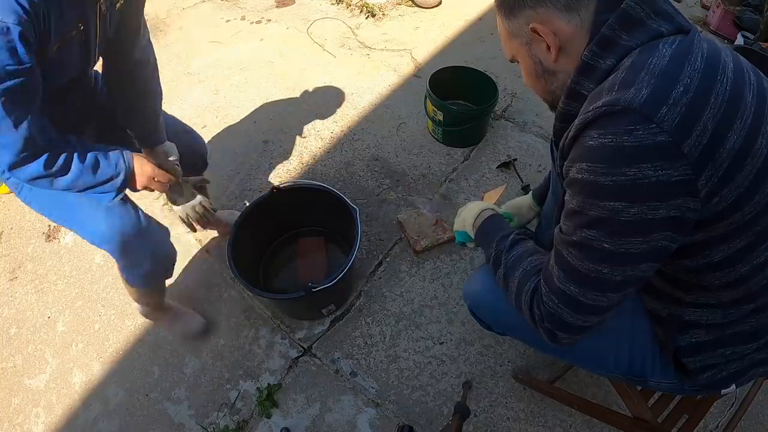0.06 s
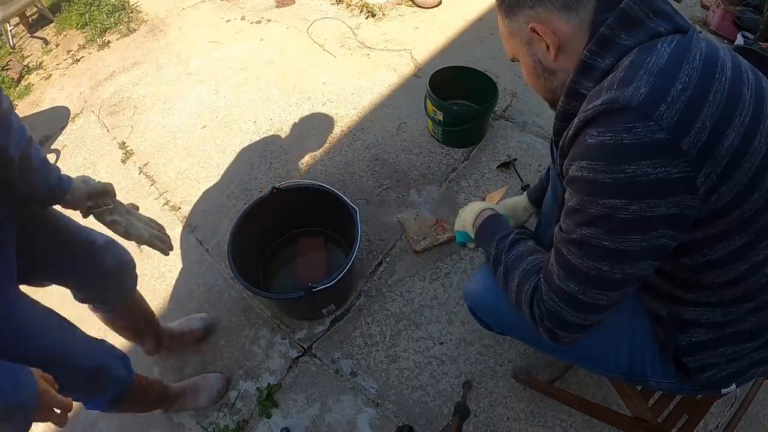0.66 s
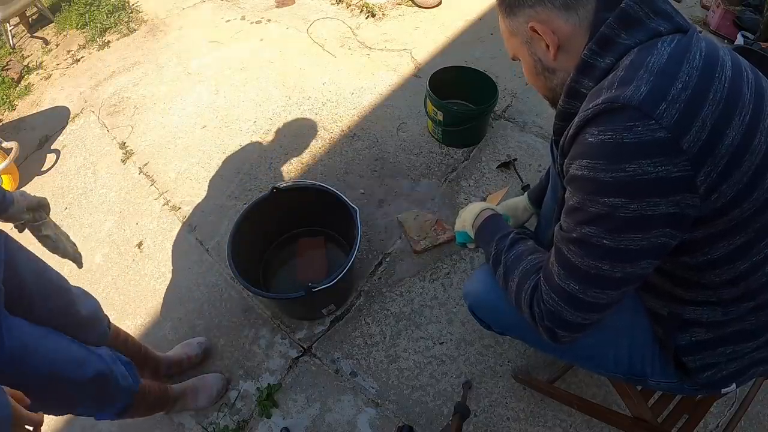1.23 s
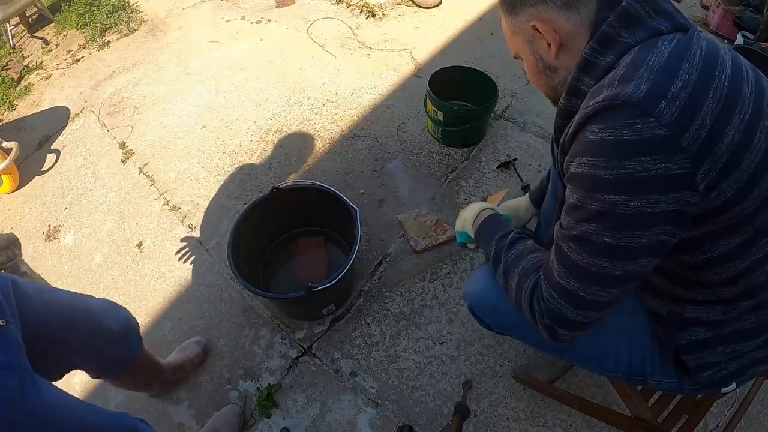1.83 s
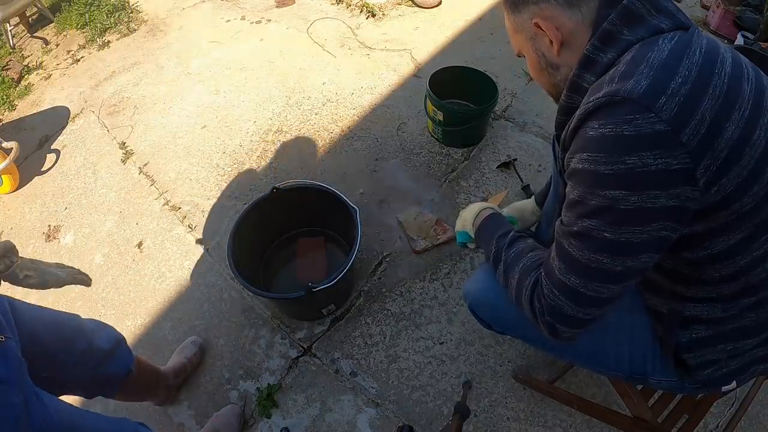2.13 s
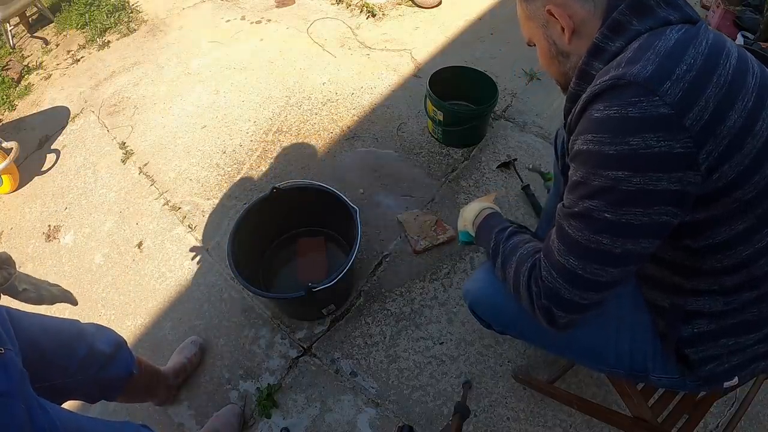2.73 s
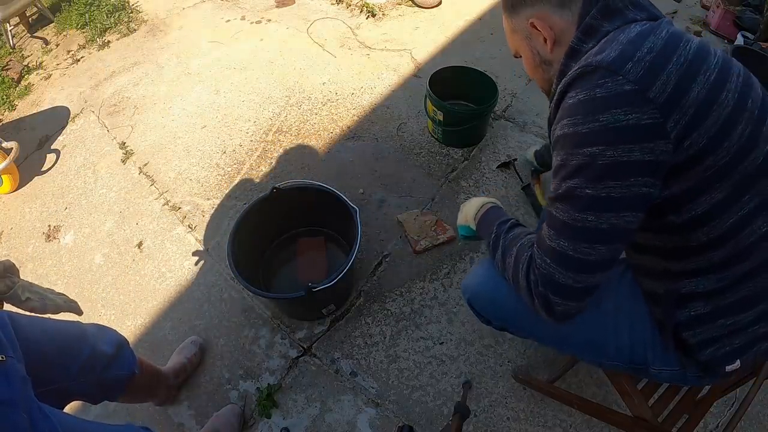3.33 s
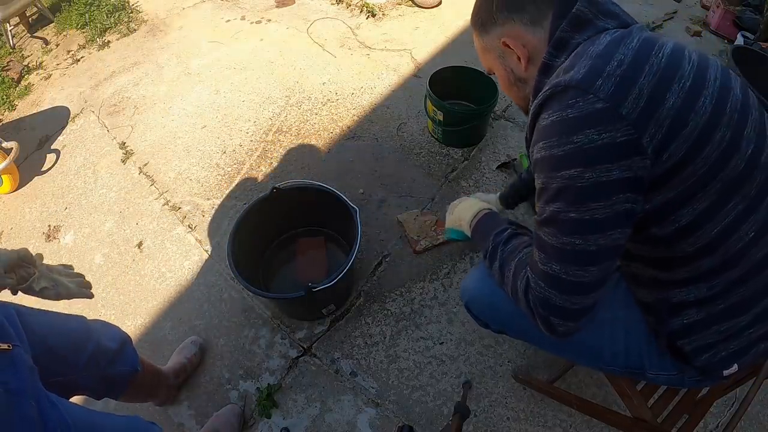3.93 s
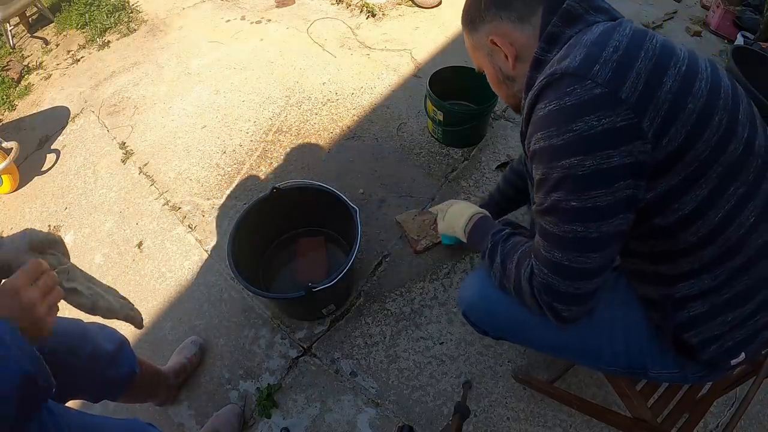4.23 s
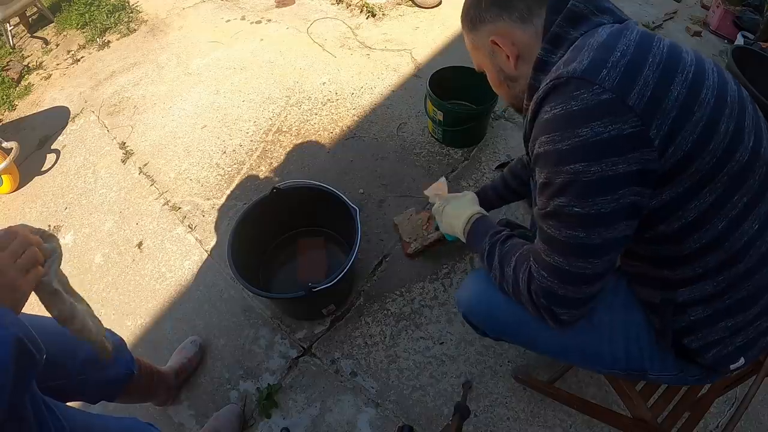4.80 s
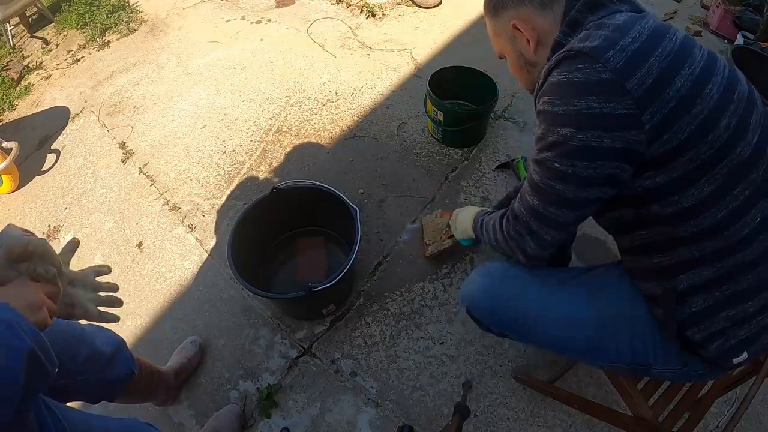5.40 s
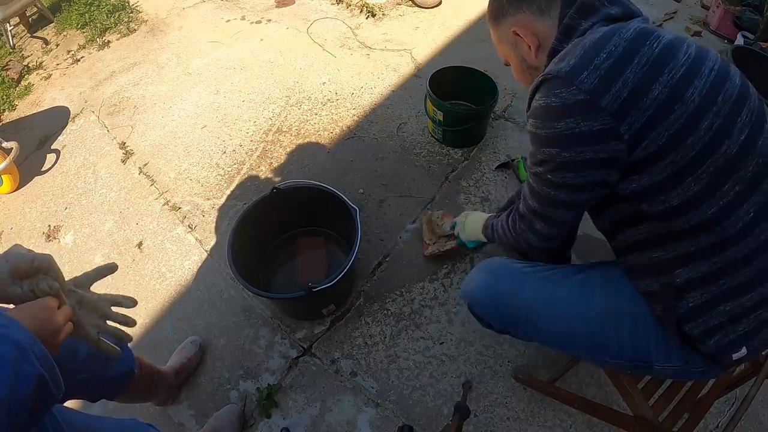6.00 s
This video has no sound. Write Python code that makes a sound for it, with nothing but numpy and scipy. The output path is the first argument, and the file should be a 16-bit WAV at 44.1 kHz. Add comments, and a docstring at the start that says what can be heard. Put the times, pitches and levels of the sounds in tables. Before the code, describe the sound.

A plastic spray bottle gives six short, even hisses, its trigger clicking with each, and a soft footstep thumps near the start. After a lull with a few small clicks, a steel blade scrapes a clay tile in quick, uneven, gritty strokes while the tile rocks and knocks hollowly on concrete. The sounds are fairly close and nearly mono, with slight echoes over quiet outdoor air.

```python
"""A clay tile is scraped clean with a steel blade, in quick, uneven strokes on a concrete yard.
Grit makes tile and blade ring; the tile rocks and knocks, and the air under it sounds hollow.
Before that, six even hisses, most likely from a clicking trigger sprayer, wet the tile,
and feet thump softly. Quiet outdoor air lies behind it all, and the ground and a wall echo."""
import sys
import numpy as np
from scipy import signal
from scipy.io import wavfile
from scipy.ndimage import uniform_filter1d

SR = 44100
rng = np.random.default_rng(int(sys.argv[2]) if len(sys.argv) > 2 else 0)


def materialize(psi):
    """Save the field psi as 16-bit PCM at rate SR to the path in sys.argv[1].

    A 1-D psi becomes a single channel; in a 2-D psi each row is a channel.
    """
    bounded = np.clip(np.atleast_2d(psi).T, -1, 1)
    quanta = np.round(bounded * 32767).astype(np.int16)
    wavfile.write(sys.argv[1], SR, quanta)


N = 271248
T = np.arange(N) / SR

# overall tone of the tile, the blade and the spray: (frequency [Hz], level [dB])
TILE_TONE = [(100, -47), (300, -37), (500, -23), (1000, 5.5), (1500, -2.5), (2400, 0.5), (3300, 0),
             (4500, -1), (6500, -13.5), (8200, -18.5), (10500, -28), (13000, -61.5)]
BLADE_TONE = [(500, -28), (2500, -1.5), (4500, 0.5), (7000, -11), (8400, -7), (9700, -9.5), (12300, -11),
              (13300, -26), (14300, -52)]
SPRAY_TONE = [(59, -75), (100, -35.5), (239, -16), (347, -18.5), (427, -11.5), (703, -3), (865, -7),
              (1090, -4), (1580, -4.5), (3620, 1), (6750, -8.5), (8300, -13), (10700, -9), (12100, -13.5),
              (14200, -32.5)]
# notes at which the tile and the blade ring: (pitch [Hz], width [Hz], boost [dB])
TILE_NOTES = [(1850, 80, -19.5), (2108, 430, 6), (2493, 190, 9), (2840, 19, 8), (3200, 120, 12.5),
              (3940, 220, 2), (6700, 520, 6.5)]
BLADE_NOTES = [(2430, 39, 5.1), (3316, 44, 4.2), (4000, 30, 9), (4045, 30, 19.4), (4934, 38, 7.4),
               (5500, 60, 7.4), (6140, 61, 17), (6940, 118.4, 20), (8100, 39, 12.13), (9270, 110, 16.5),
               (10030, 90, 15), (11250, 130, 11), (12200, 60, 4.7), (12800, 50, 9.4)]
# trigger squeezes: (full pressure at [s], let go at [s], first hiss level [dB], click level [dB])
SQUEEZES = [(-.04, 0.072, -26.5, -30), (0.441, 0.568, -18.5, -26), (0.933, 1.083, -22, -27),
            (1.436, 1.584, -21.5, -28), (1.995, 2.169, -19.5, -32), (2.435, 2.598, -22.5, -28)]


def scrapes(swell_db=19.5, fade_db=27.5, release_s=0.031, judder_db=2, settle_db=9.5, settle_ratio=1.15):
    """The edge catches and slips; its grit shakes the tile, the air under it and the blade."""
    # hand strokes: (start [s], swell [s], fade [s], level [dB], flatness [0-1], hollow pitch [Hz])
    strokes = [(1.873, .012, 0.48, -40.5, 0.57, 1000), (3.668, 0.018, 0.058, -31.5, 0.54, 1050),
               (4.264, 0.061, 0.036, -17.5, 0.48, 560), (4.352, 0.067, 0.045, -17, 0.73, 604),
               (4.783, 0.011, 0.061, -29, 1, 1040), (4.898, 0.027, 0.081, -28, 1, 2330),
               (4.921, 0.018, 0.09, -24.5, 0.96, 1006), (4.961, 0.021, 0.068, -25.5, 0.87, 1060),
               (5.24, 0.0067, 0.095, -29, 0.84, 680), (5.281, 0.07, 0.04, -28, 0.83, 810),
               (5.381, 0.003, 0.07, -25, 0.54, 1080), (5.448, .018, .14, -29.5, 0.05, 900),
               (5.535, 0.029, 0.045, -28, 0.28, 940), (5.641, 0.0054, 0.08, -25.5, 0.3, 810),
               (5.707, 0.021, .05, -14, 0.55, 565), (5.891, 0.0053, 0.09, -35, 0.34, 850),
               (5.932, 0.041, 0.11, -16.5, 0.2, 1040), (6.01, .009, 0.016, -7, .4, 766),
               (6.03, 0.041, 0.02, -25, 0.63, 595), (6.095, 0.0042, 0.17, -27.5, 0.28, 744)]
    out, t = np.zeros(N), T[:SR // 3]
    for start, swell, fade, db, flat, hollow_hz in strokes:
        length = swell + fade
        force = amp(np.interp(t, [0, swell, length], [-swell_db, 0, -fade_db]))
        force *= np.exp(-np.maximum(t - length, 0) / release_s)
        slips = unit(amp(judder_db * unit(uniform_filter1d(rng.standard_normal(len(t)), size=180))))
        grit = grains(len(t), per_s=1200, spread_db=4.5, dust=.35)
        rub = force * slips * (1 - np.exp(-t / .001)) * grit
        cutoff_hz = 16000 / 2 ** (2.8 * flat ** 4)  # a flat face rubs duller
        rub = signal.lfilter(*signal.butter(1, cutoff_hz, fs=SR), rub)
        tile, blade = sliding(rub, TILE_TONE, TILE_NOTES), sliding(rub, BLADE_TONE, BLADE_NOTES)
        settled = np.interp(t, [0, swell, length], [0, .5, 1])  # the hollow note gets lower and louder
        gap = through(rub * (1 - settled), hollow(hollow_hz * settle_ratio))
        gap += through(rub * settled * amp(settle_db * settled), hollow(hollow_hz / settle_ratio))
        gains = balance(db, flat, hollow_db=(-21, 4), blade_db=(6.5, -32))
        for sound, gain in zip((tile, gap, blade), gains):
            add(out, start, gain * unit(sound) * np.sqrt(np.mean(force ** 2)))
    return out


def knocks(crumble_s=0.0026, chatter_s=0.0097):
    """The tile lands and crushes grit; the flatter it lands, the duller and more hollow the knock."""
    # hits of tile and blade: (time [s], level [dB], flatness [0-1], hollow pitch [Hz])
    hits = [(3.714, -22, 0.32, 1200), (4.264, -18.5, 0.45, 1770), (4.326, -2.5, 0.31, 456),
            (4.376, -9, 0.36, 700), (4.413, -2, 0.46, 420), (4.784, -9, 0.81, 994), (4.809, -16, 0.9, 1160),
            (4.965, -14, 0.53, 1010), (4.993, -11, 0.55, 1090), (5.017, -7, 0.51, 997),
            (5.241, -9, 0.42, 690), (5.289, -17, 0.7, 620), (5.385, -16, 0.28, 1000), (5.45, -23.5, 0, 909),
            (5.692, -23, 0.12, 787), (5.756, -13, 0.14, 536), (5.961, -7, 0, 1000), (5.994, -4.5, 1, 823),
            (6.023, -6.5, 0.9, 660), (6.035, -4.5, 0.44, 680), (6.081, -22, 0, 700)]
    out, t = np.zeros(N), T[:SR // 10]
    tile, blade = response(TILE_TONE, TILE_NOTES), response(BLADE_TONE, BLADE_NOTES)
    for start, db, flat, hollow_hz in hits:
        blow = (t == 0) + 0.25 * rng.standard_normal(len(t)) * np.exp(-t / crumble_s)
        cutoff_hz = max(14000 / 2 ** (5.1 * flat ** 2), 1500)
        blow = signal.lfilter(*signal.butter(2, cutoff_hz, fs=SR), blow)
        gap = hollow(hollow_hz)
        chatter = rng.standard_normal(len(t)) * np.exp(-t / chatter_s)  # the tile settles
        gap = unit(gap) + 0.73 * unit(through(gap, chatter))
        gains = balance(db, flat, hollow_db=(-28, 24), blade_db=(6, -61))
        for sound, gain in zip((through(blow, tile), gap, through(blow, blade)), gains):
            add(out, start, gain * sound / abs(sound).max())
    return out


def sliding(rub, tone, notes, spots=3, spot_s=0.028):
    """As the edge travels, the ringing passes from one touching spot to the next."""
    travel = T[:len(rub)] / spot_s
    shares = [np.maximum(np.cos(2 * np.pi * (travel - k) / spots), 0) for k in range(spots)]
    return sum(through(rub * share, touched(tone, notes)) for share in shares)


def touched(tone, notes, spread_db=3.5, detune=0.014):
    """Each spot brings out other notes, and the grip shifts their pitch a little."""
    chance = rng.standard_normal((len(notes), 2))
    return response(tone, [(hz * (1 + detune * shift), width, db + spread_db * boost)
                           for (hz, width, db), (shift, boost) in zip(notes, chance)])


def hollow(hz, fade_s=0.013):
    """The air gap under the tile gives a short, hollow note."""
    upper = amp(-6) * ring(hz * 1.5, fade_s * 0.81, rise_s=0.0014)
    lower = amp(-9) * ring(hz * 0.704, fade_s * 0.88, rise_s=0.00071)
    note = ring(hz, fade_s, rise_s=0.00023) + upper + lower
    return signal.lfilter(*signal.butter(2, [hz * 0.77, min(hz * 12, 14000)], "band", fs=SR), note)


def balance(db, flat, hollow_db, blade_db):
    """Volumes of tile, hollow and blade; each pair is (on edge [dB], flat [dB]) relative to the tile."""
    levels = np.array([0, np.interp(flat, [0, 1], hollow_db), np.interp(flat, [0, 1], blade_db)])
    return amp(db + levels - levels.max())


def sprays(rise_db_per_s=900, fall_db_per_s=355, leak_db=-19.5, spent_db=-22, lead_s=.03):
    """The jet hisses under pressure; it is fullest mid-squeeze and loses its fizz as it dies."""
    # peaks in the hiss: (frequency [Hz], width [Hz], boost [dB])
    hiss_peaks = [(3500, 2500, -14.5), (6670, 940, 3.5), (9400, 480, 4), (12000, 400, -2.5)]
    level, fullness = np.zeros(N), np.zeros(N)
    for full, let_go, db, _ in SQUEEZES:
        early, late = np.maximum(full - T, 0), np.maximum(T - let_go, 0)
        progress = np.clip((T - full) / (let_go - full), 0, 1)
        onset_db = np.maximum(-rise_db_per_s * early, leak_db)  # the nozzle leaks before full pressure
        jet = amp(db + onset_db + (spent_db - db) * progress - fall_db_per_s * late)
        jet *= np.clip((T - full + lead_s) / 0.0028, 0, 1)  # the valve opens
        mist = amp(-73 - 28.5 * late) * progress
        level += jet + mist
        fullness += jet * amp(2 - 6 * np.cos(np.pi * progress * .85) ** 2)
    droplets = grains(N, per_s=5000, spread_db=5, dust=1.1)
    hiss = unit(through(droplets, response(SPRAY_TONE, hiss_peaks)))
    body = signal.sosfiltfilt(signal.butter(2, 1100, fs=SR, output="sos"), hiss)
    fizz = signal.sosfiltfilt(signal.butter(2, 7000, "high", fs=SR, output="sos"), hiss)
    fizz_left = np.minimum(level / amp(-36.5), 1) ** 0.049
    return fullness * body + level * (hiss - body - (1 - fizz_left) * fizz)


def plastic_clicks(trigger_hz=4270, trigger_fade_s=.01, snap_s=0.0036, rattle_s=0.0022):
    """The bottle and its trigger snap: thin, loose plastic rings briefly and strikes twice."""
    # clicks of the bottle: (time [s], peak level [dB], pitch [Hz], fade [s])
    bottle_clicks = [(.115, -26, 1640, 0.0077), (0.695, -40, 4500, .016), (1.202, -44.5, 5500, .016),
                     (1.38, -34, 4150, 0.02), (1.943, -23, 3200, 0.011), (2.664, -14, 5040, 0.003),
                     (2.793, -37, 3120, 0.0077), (3.537, -31.5, 1623, .03), (3.547, -28.5, 4070, 0.003)]
    # notes of the plastic: (pitch [times the click's pitch], level [dB])
    plastic_notes = [(.56, -15), (0.738, -2.5), (1, 9), (1.129, 5.5), (1.48, -2.5), (1.8, -13), (2.25, -13)]
    out, t, tone = np.zeros(N), T[:SR // 5], response(SPRAY_TONE)
    presses = [(full - 0.025, db, trigger_hz, trigger_fade_s) for full, _, _, db in SQUEEZES if full > 0]
    releases = [(let_go + .068, -36, trigger_hz, trigger_fade_s) for _, let_go, _, _ in SQUEEZES]
    for start, db, hz, fade_s in presses + releases + bottle_clicks:
        notes = sum(amp(note_db) * ring(hz * ratio, fade_s, 0.0008) for ratio, note_db in plastic_notes)
        chatter = rng.standard_normal(len(t))
        rattle = unit(through(chatter * np.exp(-t / rattle_s), notes))
        snap = unit(through(chatter * np.exp(-t / snap_s), tone))
        click = signal.lfilter(*signal.butter(2, min(3 * hz, 14000), fs=SR), rattle + 0.38 * snap)
        click /= abs(click).max()
        add(out, start, amp(db) * click)
        add(out, start + 0.01, amp(db - 9) * click)  # the bounce
    return out


def footsteps(low_cut_hz=135):
    """A soft sole lands on concrete: a few low notes that die quickly."""
    # a foot thump at 0.332 s, sounding again twice off ground and wall, and a later faint thump: (time [s],
    # level [dB], pitch [Hz])
    thumps = [(.332, -1.5, 294.4), (.340, -2.5, 239), (0.35, -12, 266), (1.609, -26, 203)]
    # notes of a thump: (pitch [times the thump's pitch], level [dB], fade [s])
    notes = [(0.998, -1.5, 0.036), (1.452, -8.5, 0.027), (2.501, -15, 0.019), (6.2, -36, 0.061)]
    out = np.zeros(N)
    for start, db, hz in thumps:
        thump = sum(amp(note_db) * ring(hz * ratio, fade_s, 0.0013) for ratio, note_db, fade_s in notes)
        add(out, start, amp(db) * thump)
    return signal.sosfilt(signal.butter(3, low_cut_hz, "high", fs=SR, output="sos"), out)


def yard(dry, tail_db=-20, dull_hz=6000):
    """Nearby surfaces add a few echoes and a short, thin tail, slightly different at each ear."""
    # how long the tail lasts: (frequency [Hz], time to fall 60 dB [s])
    tail_fades = [(150, 0.3), (500, 0.12), (2000, 0.2), (5000, 0.05), (9000, 0.076), (14000, 0.32)]
    # echoes off ground, body and wall: (delay [s], level [dB])
    echoes = [(.0023, -26), (.0085, -25.5), (.0135, -25.5), (.019, -23.5), (.027, -31.5)]
    bounces = rng.choice([-1., 1.], (3, SR // 2)) * (rng.random((3, SR // 2)) < 4000 / SR)
    hz, t, bands = signal.stft(bounces * np.minimum(T[:SR // 2] / 0.004, 1), SR, nperseg=256)
    bands *= np.exp(-np.log(1000) * t / value_at(tail_fades, hz)[:, None])
    bands /= np.hypot(1, hz / dull_hz)[:, None]
    tails = signal.istft(bands, SR, nperseg=256)[1]
    tails = tails[:2] + 9.9 * tails[2]  # both ears share most of the tail
    tails *= amp(tail_db) / np.linalg.norm(tails[0])
    for delay, db in echoes:
        for ear in tails:
            add(ear, delay, amp(db) * np.array([.25, .5, .25]))  # rough surfaces return less treble
    return dry + np.array([through(dry, ear) for ear in tails])


def air():
    """Quiet outdoor background noise that drifts in level."""
    # tone of the background: (frequency [Hz], level [dB])
    tone = [(25, -5.5), (65, -4), (110, -11), (156, -1.5), (288, -6), (516, -9.5), (768, -15.5),
            (1100, -10.5), (2050, -16), (4000, -24), (8400, -41), (11000, -41), (14200, -55)]
    # its loudness: (time [s], level [dB])
    levels = [(0.0, -56), (2.71, -58), (3.19, -64.5), (5.2, -53)]
    noise = unit(through(rng.standard_normal(N), response(tone)))
    return noise * amp(np.interp(T, *np.transpose(levels)))


def grains(count, per_s, spread_db, dust):
    """Grit or droplets: clicks of uneven size over a bed of fine noise."""
    sizes = amp(spread_db * np.minimum(rng.exponential(1, count), 3)) * rng.choice([-1, 1], count)
    clicks = sizes * (rng.random(count) < per_s / SR)
    return unit(unit(clicks) + dust * rng.standard_normal(count))


def ring(hz, fade_s, rise_s):
    """One note that starts softly and falls 60 dB in fade_s."""
    t = T[:SR // 5]
    return np.sin(2 * np.pi * hz * t) * np.exp(-np.log(1000) * t / fade_s) * (1 - np.exp(-t / rise_s))


def response(tone, notes=(), size=4096):
    """How a thing sounds after one sharp tap: its overall tone with ringing notes on top."""
    hz = abs(np.fft.fftfreq(size, 1 / SR))
    peaks = sum(amp(db) ** 2 / (1 + (2 * (hz - pitch) / width) ** 2) for pitch, width, db in notes)
    log_gain = np.log(amp(value_at(tone, hz)) * np.sqrt(1 + peaks) + 1e-6)
    spectrum = np.exp(np.conj(signal.hilbert(log_gain)))  # nothing sounds before the tap
    tap = np.fft.ifft(spectrum).real[:size // 2]
    return tap / np.linalg.norm(tap)


def through(x, tap):
    return signal.oaconvolve(x, tap)[:len(x)]


def amp(db):
    return 10 ** (np.asarray(db) / 20)


def unit(x):
    return x / np.sqrt(np.mean(x ** 2) + 1e-20)


def value_at(points, hz):
    frequencies, values = np.transpose(points)
    return np.interp(np.log(hz + 1), np.log(frequencies + 1), values)


def add(mix, start_s, sound):
    part = mix[max(round(start_s * SR), 0):][:len(sound)]
    part += sound[:len(part)]


def scene():
    """The work echoes in the yard, over the outdoor air."""
    return yard(sprays() + plastic_clicks() + scrapes() + knocks() + footsteps()) + air()


def record(dry, split_hz=11700, ceiling=.76, low_cut_hz=105, high_cut_hz=14400):
    """The sound is nearly mono and widens only in the top treble; deep bass and the very top are cut."""
    late = np.interp(T - .0005, T, dry.mean(0))  # slightly delayed copy that widens the treble
    treble = signal.sosfilt(signal.butter(14, split_hz, "high", fs=SR, output="sos"), late)
    side = 0.0071 * late + 0.68 * treble
    stereo = dry + np.array([-side, side])
    stereo = stereo / (1 + (stereo / ceiling) ** 6) ** (1 / 6)  # loud peaks are rounded off
    stereo = signal.sosfilt(signal.butter(3, low_cut_hz, "high", fs=SR, output="sos"), stereo)
    high_cut = signal.firwin(255, high_cut_hz, window=("kaiser", 9), fs=SR)
    return signal.oaconvolve(stereo, high_cut[None], "same")


dry = scene()
out = record(dry)
materialize(out)
```